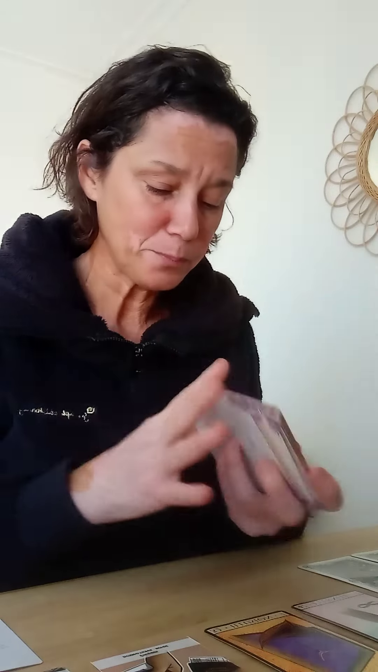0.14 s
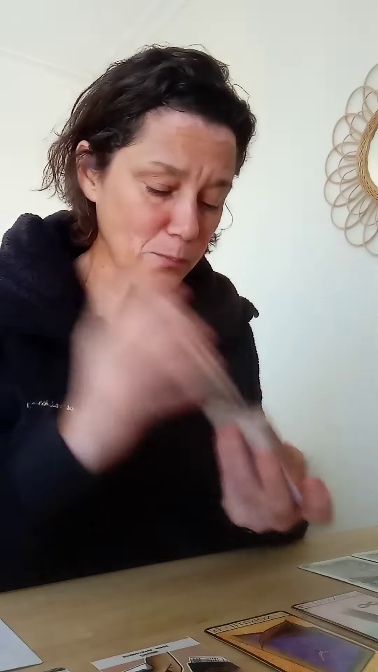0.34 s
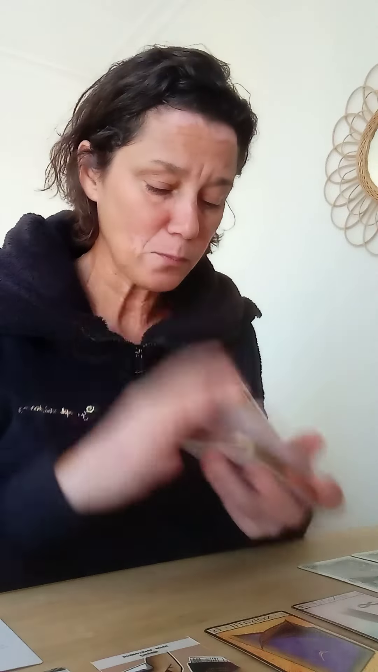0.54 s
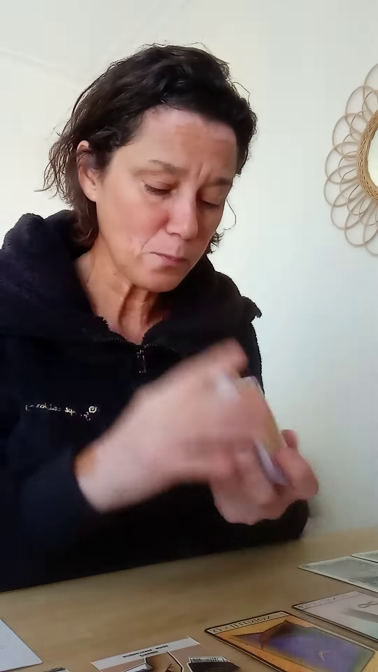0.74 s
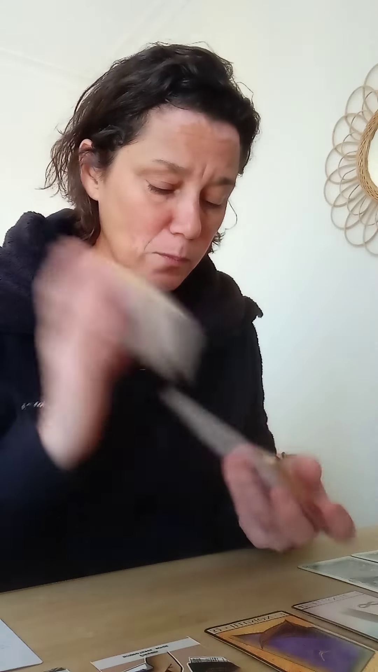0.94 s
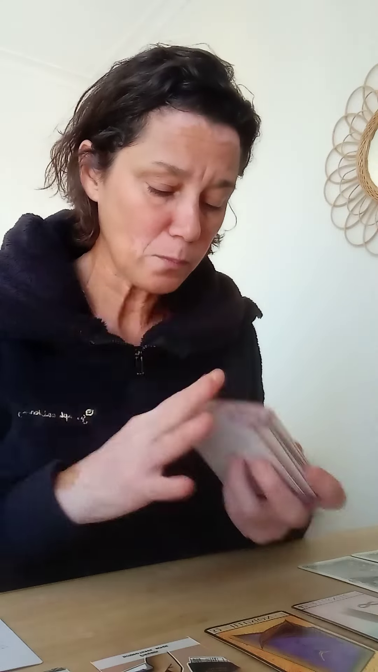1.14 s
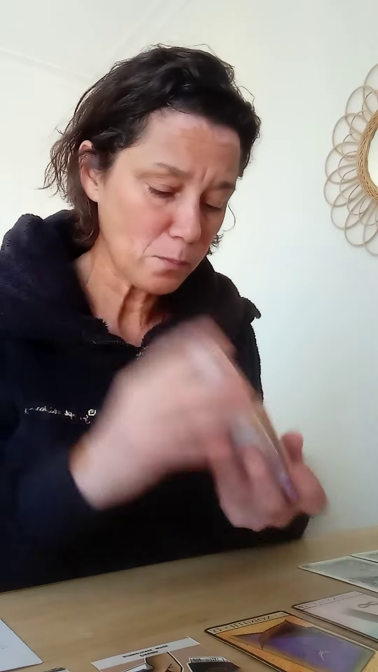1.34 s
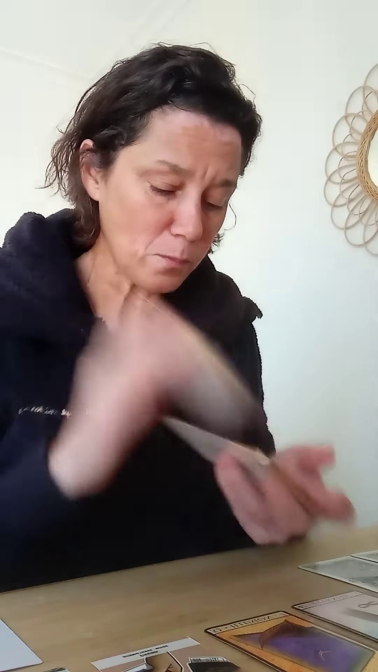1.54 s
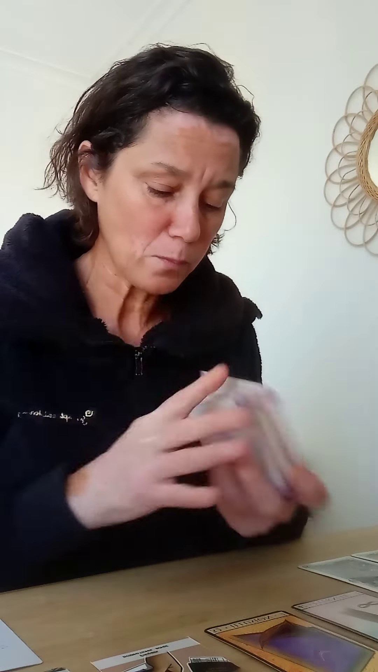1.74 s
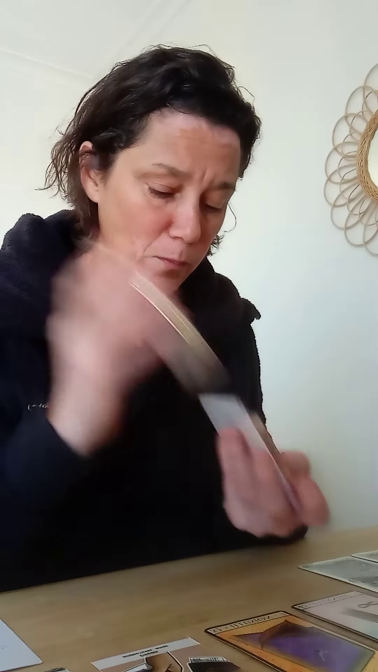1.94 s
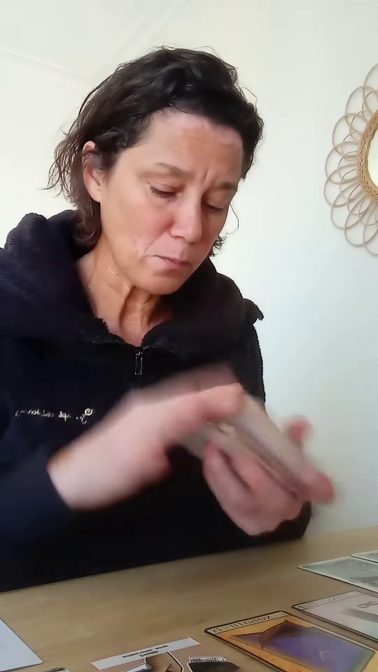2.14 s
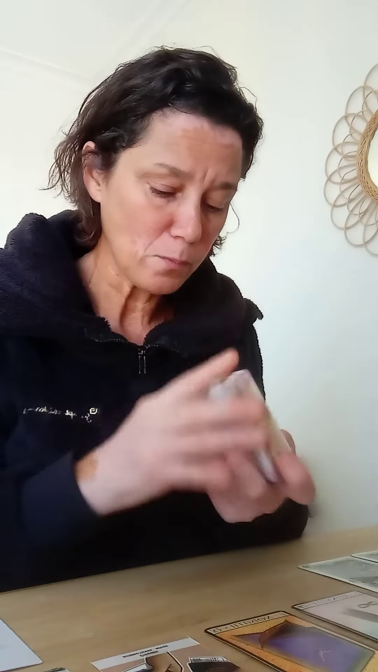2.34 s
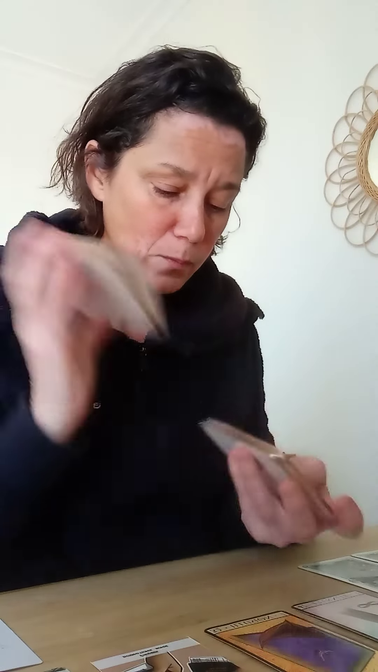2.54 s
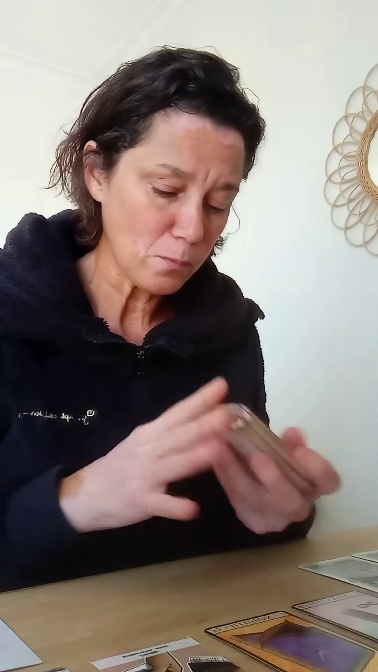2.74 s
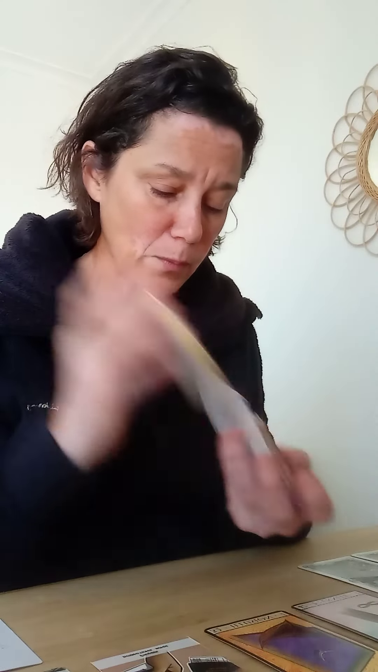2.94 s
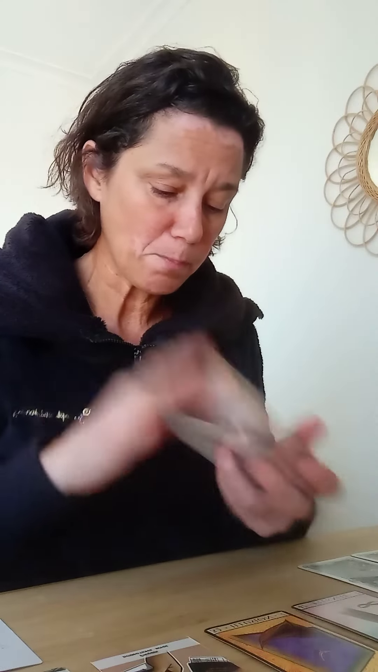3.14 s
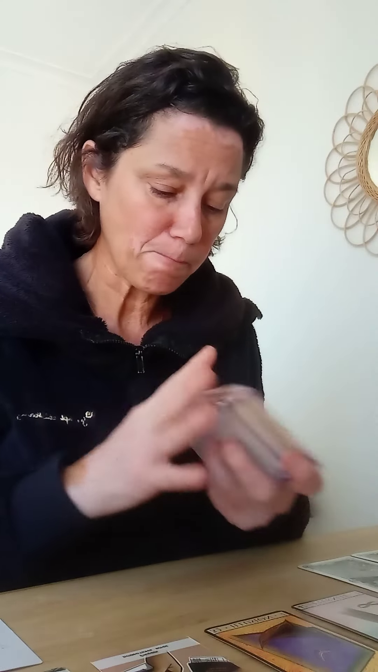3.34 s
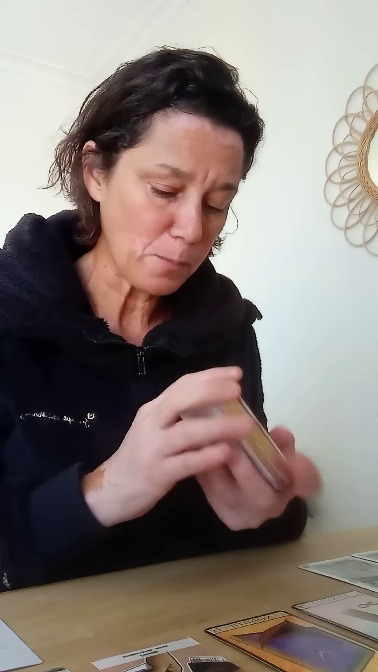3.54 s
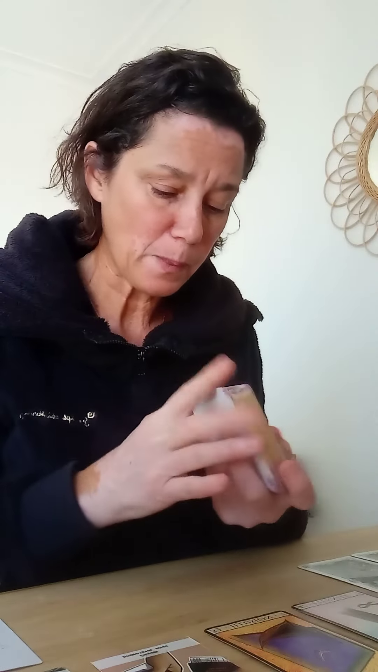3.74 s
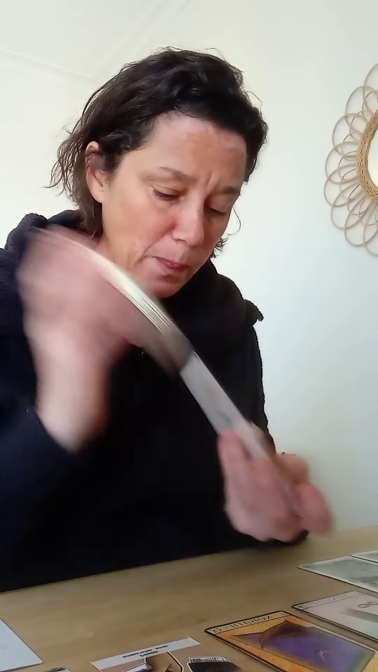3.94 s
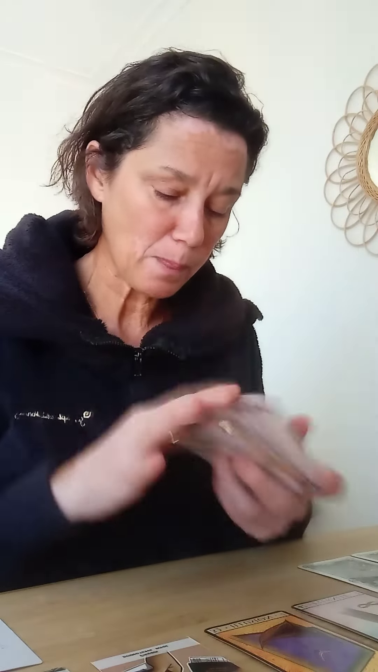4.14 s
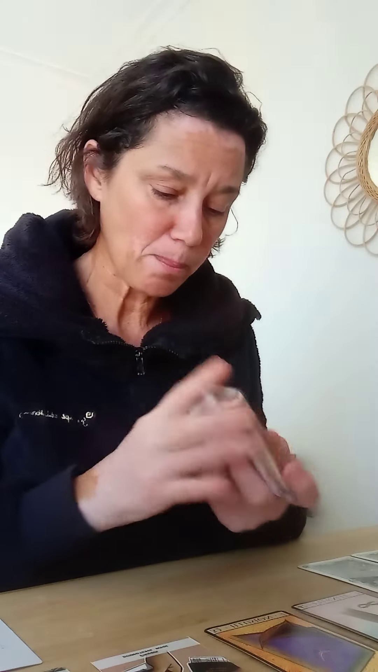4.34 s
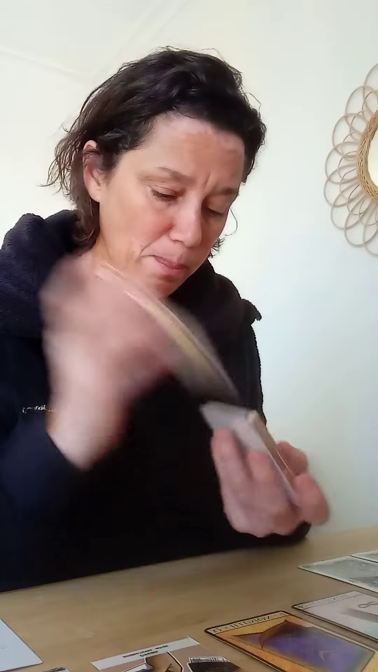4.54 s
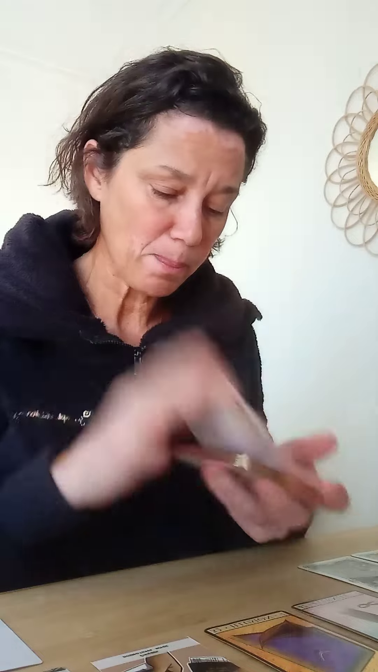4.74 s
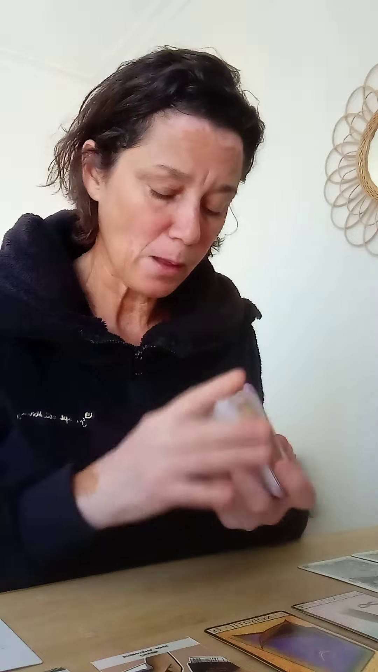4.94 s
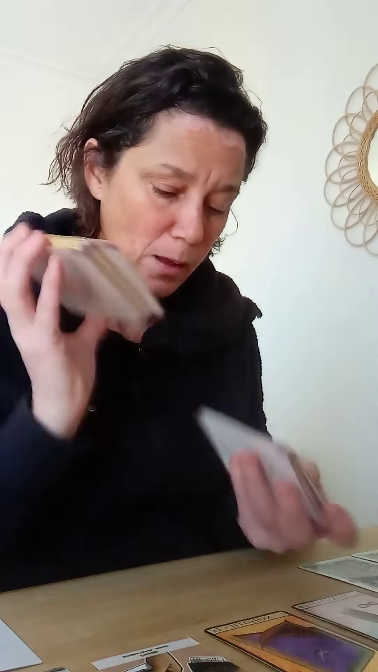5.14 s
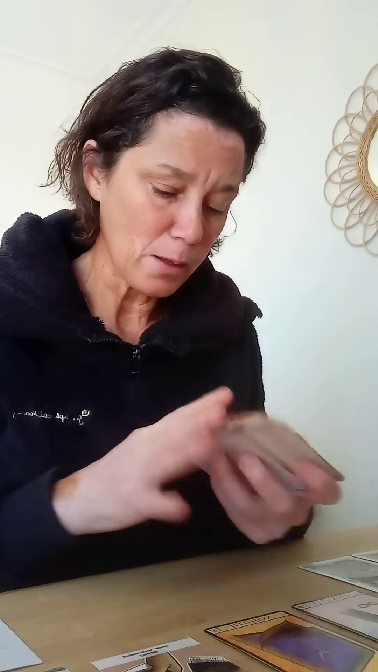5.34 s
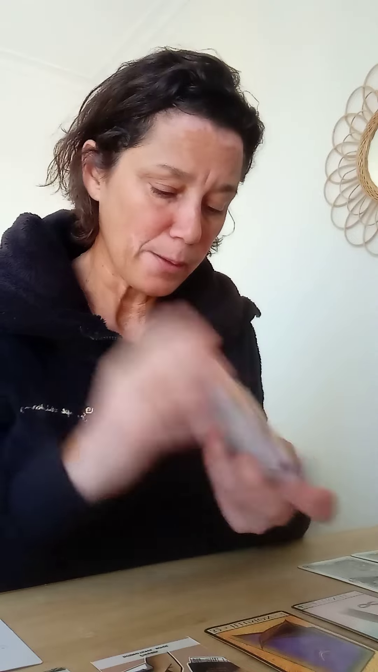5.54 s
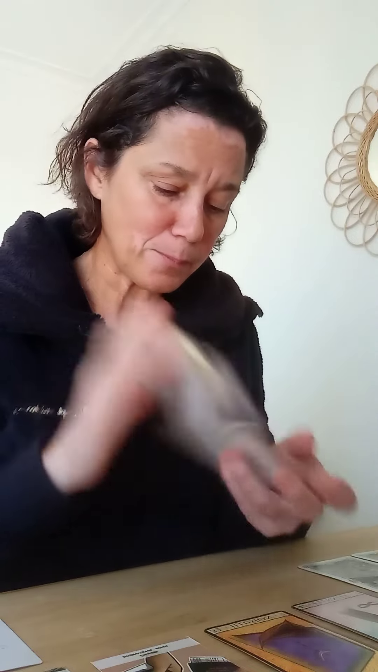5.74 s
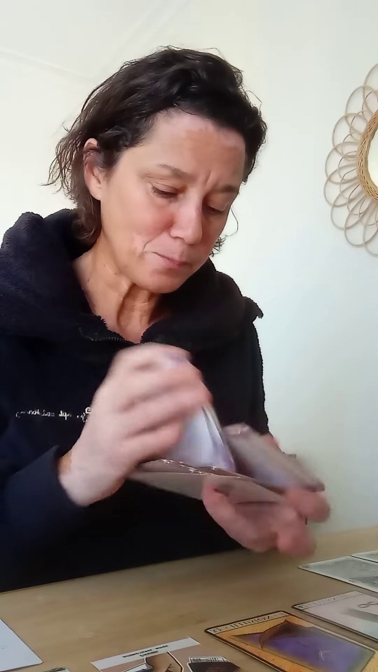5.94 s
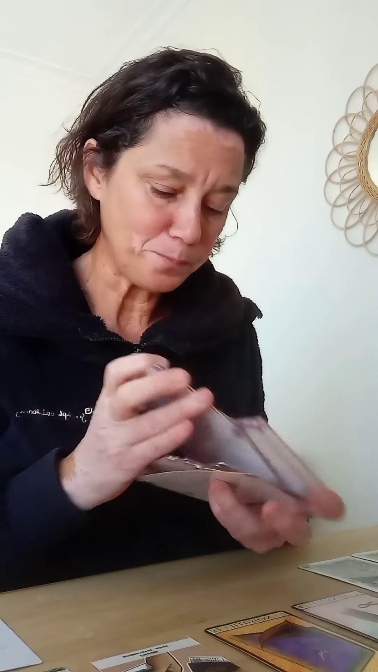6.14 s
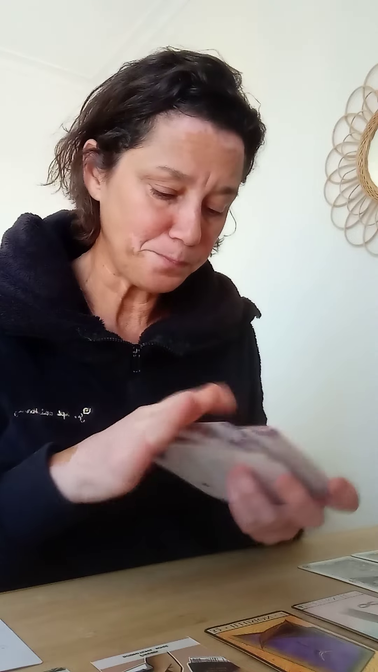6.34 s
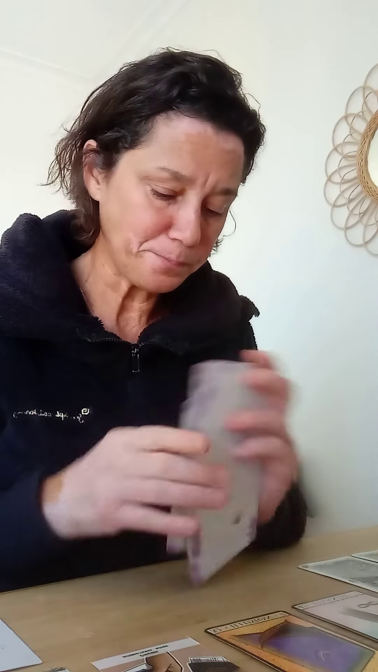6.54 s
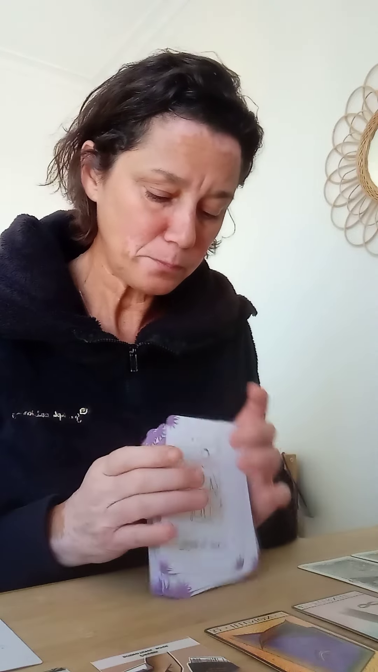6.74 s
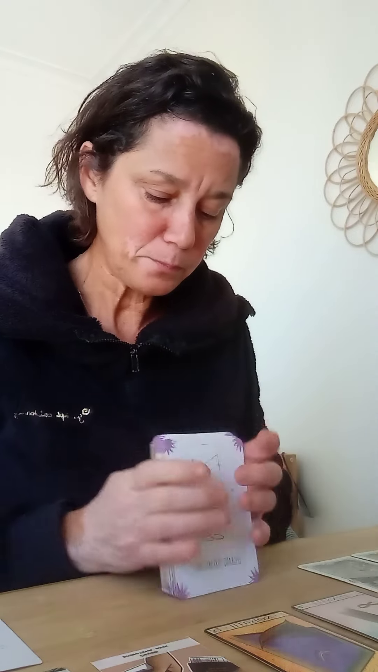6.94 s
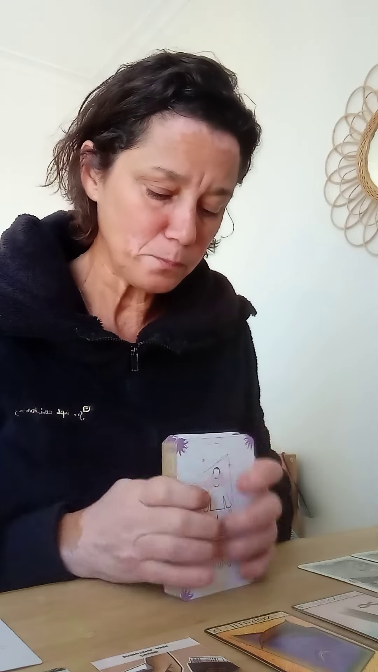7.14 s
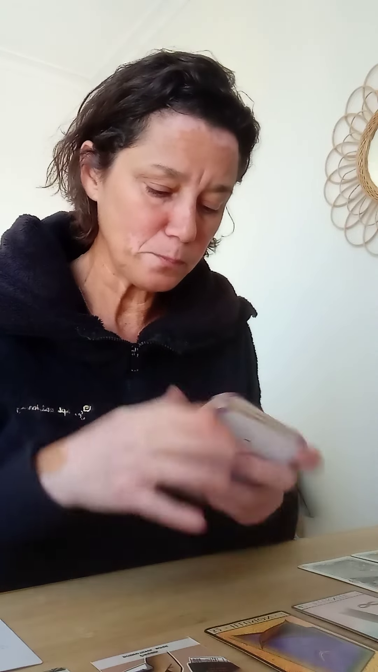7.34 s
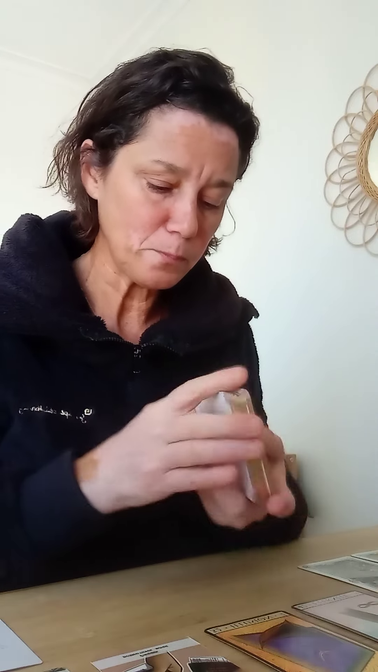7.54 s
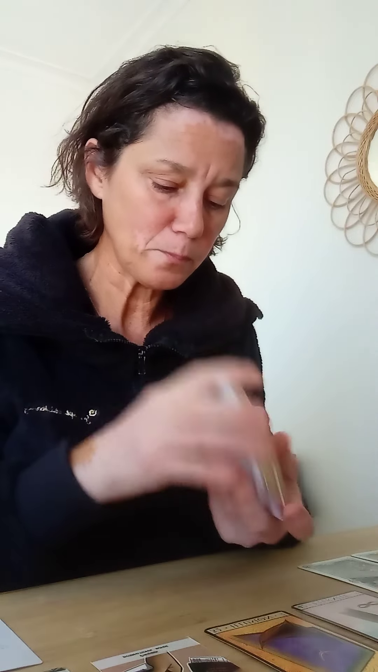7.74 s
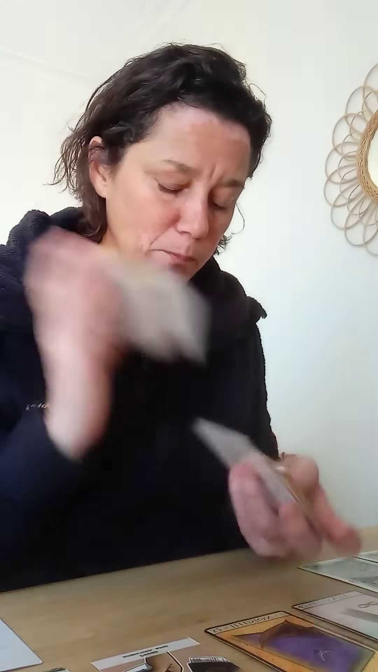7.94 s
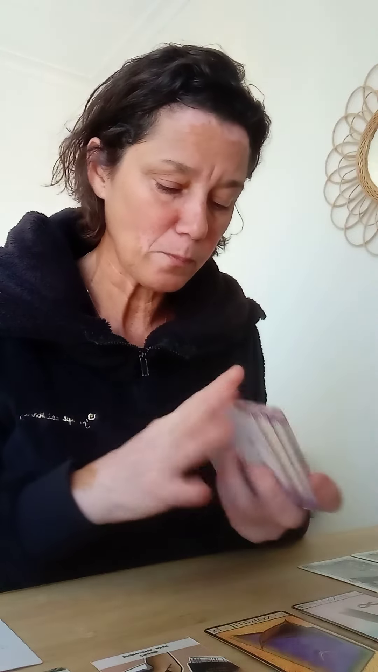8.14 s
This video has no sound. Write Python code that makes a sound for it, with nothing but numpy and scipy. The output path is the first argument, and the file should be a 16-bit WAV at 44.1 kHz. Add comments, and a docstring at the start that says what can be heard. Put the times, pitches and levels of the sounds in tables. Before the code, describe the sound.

Crisp papery card slaps and short slides repeat in a quiet bare room, interrupted by a clattering burst of deck-on-wood taps.

```python
"""Packets of large cards slap back into a deck about twice a second: an overhand shuffle in a quiet, bare room.
Each slap is a cluster of noisy card contacts; claps are pressure spikes, slides are grainy filtered noise.
Near the end the deck drops on edge on a wooden table, whose top rings as decaying modes, and is squared up.
Then the shuffle goes on. Room reflections are noise bands that follow the energy of the hands and table."""
import sys
import numpy as np
from scipy import signal
from scipy.fft import rfft, irfft
from scipy.io import wavfile
from scipy.ndimage import uniform_filter1d

SR = 44100
rng = np.random.default_rng(int(sys.argv[2]) if len(sys.argv) > 2 else 0)


def to_wav(s):
    """Save 16-bit WAV."""
    ch = np.atleast_2d(s).T  # columns
    pcm = np.round(np.clip(ch, -1, 1) * 32767)  # PCM
    wavfile.write(sys.argv[1], SR, pcm.astype(np.int16))


N = 361619
TIME = np.arange(N) / SR

# A packet brushes the deck, lands on its edge, then falls flat while loose cards trail after it.
# Levels are relative to the layer gains. Each row: edge landing in seconds, brush lead in ms,
# brush level in dB, edge level in dB, fall time in ms, flat level in dB, extra bass in dB, extra treble in dB,
# trail in ms, palm thump in dB, air pocket in Hz, its boost in dB, card flex in Hz, its boost in dB.
STROKES = [(0.0514, 16.4, -34.5, -24.5, 7, -26, -3.5, -1, 8.9, -50.5, 543, 7, 3340, 5),
           (.583, 10.5, -41.5, -26, 16.6, -30.5, -3.5, 1.5, 12.1, -52, 370, 3, 1730, 4),
           (1.0511, 16, -39.5, -26, 12, -30.5, -0.5, 0, 28.7, -40.5, 358, 3.5, 990, 2),
           (1.611, 4.3, -43, -28, 18, -29.5, -5, 0.5, 8.4, -42, 497, 9, 5040, -0.5),
           (2.178, 12.1, -32.5, -29.5, 8.9, -36.5, -3.5, 0.5, 21, -50.5, 373, 2.5, 3300, 0.5),
           (2.673, 21.2, -39, -30.5, 12.5, -24, -1.5, -3.5, 4.8, -46.5, 490, 1, 5500, 6.5),
           (3.195, 20.5, -37, -28.5, 2.5, -35, 2.5, 0.5, 10, -38.5, 443.5, -4, 1140, 9.5),
           (4.158, 15, -39.5, -26.5, 14.3, -31, -1.5, 2.5, 75, -42.5, 463, 3, 2300, 4),
           (4.7861, 8.3, -52.5, -21, 17.4, -21.5, -2, -1, 16, -63.5, 900, 6, 2540, 10),
           (5.2988, 15, -32.5, -18, 15, -26, -3.5, -2, 19, -40.5, 310, -2.5, 1510, 8),
           (5.8019, 22.3, -23.5, -20, 8.5, -25.5, -4.5, 0.5, 42, -52.5, 670, 7, 1520, 7.5),
           (5.9425, 15, -32, -25, 30, -28.5, -8, -6.5, 20, -48.5, 920, 0, 1640, -2),
           (6.29, 8.5, -42.5, -34.5, 16.5, -37, -2.5, 2, 10, -65, 940, 9, 1360, 8.5),
           (8.062, 17, -59, -24, 13.3, -24.5, -1.5, -4, 20, -54, 399.3, 5.5, 1530, 4.5)]
# phases of a stroke: (length ms, extra bass dB, extra treble dB)
BRUSH, EDGE, FLAT, STRAGGLER = (1.1, -1.5, -1.3), (2.37, 0, 0.59), (3.97, -1.2, 3.2), (3.1, -1.4, 0)
# riffle level against the edge and scuff level against the brush
RIFFLE_DB, SCUFF_DB = -7.5, -8
# a slow fall spreads the riffle thin; the scuff comes just before the edge lands
RIFFLE_THINNING_DB_PER_MS, SCUFF_MS = 0.07, 7
# loose cards: spacing, level under the flat blow, loss along the trail
STRAGGLER_MS, STRAGGLER_DB, TRAIL_LOSS_DB = 11, -3.5, 3
# the palm takes the blow just after the packet falls flat
THUMP_HZ, THUMP_LAG_S = 140, 0.006
# the packet swishes in ahead of its landing; level before the slide gains
SWISH_LEAD_S, SWISH_RISE_S, SWISH_DB = 0.022, 0.021, -70.5
# a slide stops in this time plus a share of its rise
STOP_S, STOP_SHARE = 0.005, 0.32
# random faint catches per slide: number, level setting against the hiss setting, tilt towards treble
CATCH_COUNT, CATCH_DB, CATCH_TILT_DB = 3, -9.5, 8
# unevenness of a card's flexing response: depth and spacing of its peaks
FLEX_DB, FLEX_SPACING_HZ = 2.7, 300
# boost at the card flex of a knock, and the weaker bounce that follows each one
KNOCK_BOOST_DB, BOUNCE_S, BOUNCE_DB = 10.5, 0.025, -12.5
LOW_CUT_HZ, CUTOFF_HZ = 81, 15900


def from_db(db):
    """Decibels to gain."""
    return 10 ** (np.asarray(db) / 20)


def rms_one(x):
    """Scale to unit rms."""
    return x / np.sqrt(np.mean(x ** 2) + 1e-20)


def at_hz(points, hz, axis=1):
    """Read a column of a table on a log-frequency axis."""
    points = np.array(points, float)
    return np.interp(np.log(hz + 1), np.log(points[:, 0]), points[:, axis])


def add(out, s, sound):
    """Mix a sound in at time s."""
    start = max(round(s * SR), 0)
    out[start:start + len(sound)] += sound[:N - start]


def response(colour, shape=1, size=2048):
    """Causal impulse response of a colour at unit rms over frequency, times a further spectral shape."""
    hz = np.arange(size // 2 + 1) * SR / size
    spectrum = rms_one(from_db(at_hz(colour, hz))) * shape
    # folding the cepstrum forward in time gives minimum phase
    cepstrum = irfft(np.log(spectrum))
    cepstrum[1:size // 2] *= 2
    cepstrum[size // 2 + 1:] = 0
    return irfft(np.exp(rfft(cepstrum)))


def through(x, impulse):
    """Convolve, keeping the length of the scene."""
    return signal.oaconvolve(x, impulse)[:N]


def ring(x, modes):
    """Drive decaying resonances of alternating sign with a sound."""
    out = np.zeros(len(x))
    for k, (hz, db, t60) in enumerate(modes):
        radius = from_db(-60 / (t60 * SR))
        w = 2 * np.pi * hz / SR
        mode = signal.lfilter([0, np.sin(w)], [1, -2 * radius * np.cos(w), radius ** 2], x + 1e-18)
        out += (-1) ** k * from_db(db) * mode
    return out


def fading(power, t60):
    """Stored energy leaks away by 60 dB in t60 seconds."""
    keep = np.exp(-np.log(1e6) / (t60 * SR))
    return signal.lfilter([1 - keep], [1, -keep], power + 1e-18)


def faint_air():
    """Very faint air is steady noise weighted towards the low end."""
    # Each row: frequency in Hz, relative level in dB.
    air_colour = [(30, -3.5), (130, 15.5), (500, -7.5), (3000, -19), (16000, -32)]
    return from_db(-86.5) * through(rng.standard_normal(N), response(air_colour))


def room(x, build_s, early_share, early_t60, count=40):
    """Cards radiate unevenly, so reflections sum to a diffuse wash that dies band by band."""
    # Reverberation. Each row: frequency in Hz, level in dB against the driving sound, t60 in seconds.
    reverberation = [(60, -5, 0.46), (127, 1, 1), (293, 3, 0.35), (740, -1.5, 0.47), (1580, -2.5, 0.51),
                     (3570, -6, 0.46), (6260, -7, 0.41), (10000, -4, 0.13), (15500, -15.5, 0.063)]
    # Standing waves of the room. Each row: frequency in Hz, drive gain in dB, t60 in seconds.
    standing_waves = [(132, -56, 0.5), (154, -58.5, 0.29), (185, -67, 0.29), (294, -53, 0.42)]
    edges = np.linspace(np.cbrt(70), np.cbrt(16200), count + 1) ** 3
    white = rng.standard_normal((2, N))
    out = ring(x, standing_waves)
    for k, (low, high) in enumerate(zip(edges, edges[1:])):
        band = signal.butter(2, [low, high], "band", fs=SR, output="sos")
        centre = np.sqrt(low * high)
        arriving = fading(signal.sosfilt(band, x + 1e-9 * white[0]) ** 2, build_s)
        # near surfaces answer first, the walls hold the rest
        near = early_share * fading(arriving, early_t60)
        walls = (1 - early_share) * fading(arriving, at_hz(reverberation, centre, axis=2))
        wash = rms_one(signal.sosfilt(band, white[k % 2]))
        out += from_db(at_hz(reverberation, centre)) * np.sqrt(near + walls) * wash
    return out


def friction(colour, grain_db, catches_per_s):
    """Sliding card catches and slips at random, so its hiss is grainy."""
    grip = np.interp(TIME * catches_per_s, np.arange(N), rng.standard_normal(N))
    return through(rms_one(rng.standard_normal(N) * from_db(grain_db * grip)), response(colour))


def slide_motions():
    """The swish before every stroke and the pairs of slides: (s, rise s, hiss dB, rub dB)."""
    # Between strokes cards slide in pairs of short hisses; levels come before the slide gains.
    # Each row: one slide in seconds, its rise in seconds, its hiss in dB, another slide in seconds,
    # its rise in seconds, its hiss in dB, edge rub against hiss in dB.
    slide_pairs = [(0.29, 0.027, -46.5, .36, 0.019, -60.5, -18.5),
                   (0.824, 0.025, -61.5, .875, 0.05, -54, -14.5),
                   (1.308, 0.018, -60, 1.40, 0.039, -55.5, -9),
                   (1.936, 0.031, -55, 1.979, .018, -56.5, -11.5),
                   (2.425, 0.073, -64, 2.487, 0.012, -51.5, -9),
                   (2.975, 0.036, -49.5, 3.06, 0.016, -67.5, -17),
                   (3.111, 0.007, -65, 3.16, 0.029, -72, -5), (3.422, 0.082, -61, 3.51, .035, -63.5, -6.5),
                   (3.58, 0.051, -67.5, 3.65, .04, -67, -5.5), (3.762, 0.007, -77, 3.812, 0.015, -73.5, 0),
                   (3.937, 0.023, -54, 3.91, 0.035, -63.5, -13.5),
                   (4.358, 0.027, -52.5, 4.432, 0.029, -53, -15.5),
                   (4.554, 0.068, -59, 4.60, .018, -63, -15),
                   (5.069, .042, -61.5, 5.11, 0.032, -57.5, -3.5),
                   (5.495, 0.022, -58.5, 5.625, 0.057, -55, -10),
                   (6.15, 0.18, -62, 6.305, 0.028, -46.5, -6), (6.39, 0.02, -56, 6.556, 0.013, -61.5, 5),
                   (7.254, 0.064, -68.5, 7.32, 0.031, -69, 5), (7.473, .012, -85.5, 7.549, 0.011, -73, 2),
                   (7.85, 0.042, -67, 7.877, 0.019, -52.5, -8.5)]
    rows = [(s - SWISH_LEAD_S, SWISH_RISE_S, SWISH_DB, SWISH_DB) for s, *_ in STROKES]
    for one_s, one_rise_s, one_db, other_s, other_rise_s, other_db, rub_db in slide_pairs:
        rows.append((one_s, one_rise_s, one_db, one_db + rub_db))
        rows.append((other_s, other_rise_s, other_db, other_db + rub_db))
    return rows


def slides(hiss_db, rub_db):
    """Smooth faces hiss and edges rub while a packet speeds up and stops."""
    # Colours of faces and edges. Each row: frequency in Hz, relative level in dB.
    hiss_colour = [(100, -30), (1500, -17), (4500, -5), (6500, 1), (8000, -9), (10000, -13), (13400, -21),
                   (15000, -3), (15700, -2), (16500, -14)]
    rub_colour = [(60, -10), (200, -8), (800, -2.5), (1500, 0.5), (3200, 5), (6000, -12.5), (16000, -48)]
    hiss, rub = np.zeros(N), np.zeros(N)
    for s, rise_s, hiss_level, rub_level in slide_motions():
        fall_s = STOP_S + STOP_SHARE * rise_s
        on = np.abs(TIME - s) < 3 * max(rise_s, fall_s)
        t = TIME[on] - s
        speed = np.exp(-(t / np.where(t < 0, rise_s, fall_s)) ** 2)
        hiss[on] += speed * from_db(hiss_level + hiss_db)
        rub[on] += speed * from_db(rub_level + rub_db)
    faces = hiss * friction(hiss_colour, grain_db=3, catches_per_s=450)
    edges = rub * friction(rub_colour, grain_db=5, catches_per_s=450)
    return faces + edges


def thumps():
    """The palm stops every packet with a soft thump: (s, dB, Hz)."""
    rows = []
    for s, _, _, _, fall_ms, _, _, _, _, thump_db, *_ in STROKES:
        rows.append((s + fall_ms / 1000 + THUMP_LAG_S, thump_db, THUMP_HZ))
    return rows


def bumps(cycles, size=4096):
    """Flesh damps the deck within a few swings: short decaying sines."""
    # The deck bumps softly against the fingers as it is regripped.
    # Each row: start in seconds, undamped level in dB, pitch in Hz.
    regrips = [(.39, -58, 170), (.901, -54, 480), (1.431, -50.5, 200), (1.457, -42, 388),
               (3.987, -41.5, 417), (4.011, -50, 159), (5.082, -50, 560), (5.642, -51, 150),
               (7.223, -52, 200.5), (7.392, -55.5, 150)]
    out, t = np.zeros(N), np.arange(size) / SR
    for s, db, hz in list(regrips) + thumps():
        add(out, s, from_db(db) * np.sin(2 * np.pi * hz * t) * np.exp(-hz * t / cycles))
    return out


def hollow_db(hollows, hz, width):
    """Trapped air and flexing cards boost the sound around their resonances, given as (Hz, dB)."""
    return sum(db / (1 + ((hz / centre - 1) / width) ** 2) for centre, db in hollows)


def contacts(rows, colour, grain_db, attack_share, sag_db, settle_ms, size=2048):
    """Cards land one after another: tiny uneven impacts that build, weaken, then settle."""
    out = np.zeros(N)
    ms = np.arange(size) * 1000 / SR
    hz = np.arange(size // 2 + 1) * SR / size
    for s, length_ms, bass_db, middle_db, treble_db, hollows in rows:
        done = np.minimum(ms / length_ms, 1)
        build = 1 - np.exp(-done / attack_share)
        settle = np.exp(-np.maximum(ms - length_ms, 0) / settle_ms)
        force = build * from_db(-sag_db * done) * settle
        impacts = force * rng.standard_normal(size) * from_db(grain_db * rng.standard_normal(size))
        # the run is evened out over frequency, so that its colour comes from the cards and the grip
        spread = np.sqrt(uniform_filter1d(np.abs(rfft(impacts)) ** 2, size=15) + 1e-12)
        # held differently each time, the cards favour other flexing frequencies
        flex_db = FLEX_DB * np.interp(hz / FLEX_SPACING_HZ, np.arange(size), rng.standard_normal(size))
        level_db = at_hz([(400, bass_db), (900, middle_db), (2000, middle_db), (3800, treble_db)], hz)
        shape_db = level_db + flex_db + hollow_db(hollows, hz, width=0.081)
        body = response(colour, from_db(shape_db) / spread)
        # longer runs carry more energy
        add(out, s, np.sqrt(length_ms * SR / 1000) * signal.fftconvolve(impacts, body))
    return out


def tick_contacts(catch_ms, scatter_db):
    """The clear catches of the grip, and faint ones scattered over each slide."""
    # Card edges catch as the deck is gripped and split; levels come before the tick gain.
    # Each row: start in seconds, length in ms, level in dB, tilt towards treble in dB.
    clear_catches = [(.3914, 3.2, -55, 7), (1.012, 4.8, -53.5, 5), (1.4186, 3.1, -56, 16.5),
                     (1.4305, 6.4, -50, -1), (1.4561, 1.3, -41.5, 7), (1.985, 3.1, -42, -1),
                     (2.336, 5.4, -52.5, 6.5), (2.4912, 2.6, -42.5, 4), (3.0127, 3.1, -50.5, 4),
                     (3.5015, 3.1, -67.5, 17), (3.9867, 7.4, -53, 7), (4.5744, 2.8, -46, 8),
                     (5.0805, 2.1, -41, 2), (5.1215, 1.1, -32.5, 3.5), (5.6139, 1.3, -62, 17),
                     (5.6582, 5, -53, 7), (6.2541, 8.6, -50, -1.5), (6.4306, 8.6, -46.5, -7.5),
                     (6.4395, 6.8, -50, 7.5), (6.5472, 12, -58, 13.5), (7.3132, 20, -56.5, 4.5),
                     (7.3911, 2.8, -56, -4), (7.4664, 6.2, -54.5, -3)]
    catches = list(clear_catches)
    for s, rise_s, hiss_db, _ in slide_motions():
        for when, luck in rng.uniform(-0.62, 1, size=(CATCH_COUNT, 2)):
            db = hiss_db + CATCH_DB + scatter_db * luck
            catches.append((s + when * rise_s, catch_ms, db, CATCH_TILT_DB))
    return [(s, ms, db - tilt_db, db, db + tilt_db, []) for s, ms, db, tilt_db in catches]


def settling():
    """Loose card edges chatter against each other as the deck is squared."""
    # Chatter envelope. Each row: time in seconds, level in dB before the mix gain.
    chatter = [(6.78, -75), (6.805, -33.5), (6.85, -38.5), (6.9, -54.5), (6.97, -63), (7.052, -60.5),
               (7.1, -71)]
    # Each row: frequency in Hz, relative level in dB.
    chatter_colour = [(100, -22), (700, 8.5), (1150, 12), (2000, 4.5), (3800, 6), (4800, -28),
                      (7000, -27.5), (9000, -50.5), (16000, -60)]
    s, db = np.transpose(chatter)
    level = from_db(np.interp(TIME, s, db, left=-np.inf, right=-np.inf))
    return level * friction(chatter_colour, grain_db=5.5, catches_per_s=700)


def knock_contacts():
    """Every drop on the table is followed by a weaker bounce of part of the deck."""
    # The deck drops on edge onto the table; levels come before the knock gain.
    # Each row: start in seconds, length in ms, level in dB, tilt towards treble in dB, card flex in Hz.
    drops = [(6.62, 4.5, -22, -0.5, 610), (6.659, 1.9, -52, 29, 2440), (6.67, 7.2, -18.5, -0.5, 2430),
             (6.7283, 7.8, -24, -3, 1660), (6.74, 1.7, -23, 6.5, 1710), (6.762, 2.2, -35, 9.5, 2450),
             (6.77, 3, -22.5, 4.5, 1650), (6.7991, 4.5, -25, 9, 3650), (6.8495, 1.3, -27.5, 5, 1670),
             (6.8745, 3.8, -26.5, 6, 2690), (6.94, 3.6, -34.5, 4, 2500), (6.953, 1.07, -30, -7.5, 870),
             (7.0, 23, -45.5, -8.5, 635), (7.0248, 5.3, -30.5, 2.5, 686), (7.221, 19, -50.5, -3, 890)]
    rows = []
    for s, ms, drop_db, tilt_db, flex_hz in drops:
        for late_s, loss_db in ((0, 0), (BOUNCE_S, BOUNCE_DB)):
            db = drop_db + loss_db
            rows.append((s + late_s, ms, db - tilt_db, db, db + tilt_db, [(flex_hz, KNOCK_BOOST_DB)]))
    return rows


def table_top(knocks):
    """The knocks excite the wooden top, which rings in its own modes."""
    # Each row: frequency in Hz, relative drive gain in dB, t60 in seconds.
    table_modes = [(197.3, -31.5, 0.33), (404, -15, 0.075), (571, -15, 0.2), (658, -37, 0.37),
                   (1003, -20.5, 0.22), (1117, -17, 0.37), (1160, -22.5, 0.32), (1148, -27.5, 0.073),
                   (1570, -27.5, 0.18), (2140, -14, 0.056), (2570, -12, 0.025)]
    return from_db(-30) * ring(knocks, table_modes)


def claps(rebound, size=512):
    """A packet closing flat squeezes out air: a pressure spike, then a slower, weaker suction."""
    # Each row: spike centre in seconds, spike level in dB before suction, width in ms.
    closings = [(0.5959, -14.5, 0.11), (2.1645, -50, 0.3), (2.6882, -19.5, 0.047), (3.2061, -19.5, 0.36),
                (4.1685, -33, 0.069), (5.3318, -7, 0.1), (5.809, -28.5, 0.14), (5.841, -30.5, .12)]
    out = np.zeros(N)
    ms = (np.arange(size) - size // 2) * 1000 / SR
    for s, db, width_ms in closings:
        u = 2 * ms / width_ms
        suction = rebound * np.exp(-(rebound * u - 1) ** 2)
        add(out, s - size / 2 / SR, from_db(db) * (np.exp(-u ** 2) - suction))
    return out


def stroke_contacts(scatter_db):
    """Each stroke unfolds as brush, scuff, edge, riffle, flat blow and a dying trail of loose cards."""
    rows = []
    for (s, lead_ms, brush_db, edge_db, fall_ms, flat_db, bass_db, treble_db,
         trail_ms, _, air_hz, air_db, flex_hz, flex_db) in STROKES:
        flat_s = s + fall_ms / 1000
        riffle_db = edge_db + RIFFLE_DB - RIFFLE_THINNING_DB_PER_MS * fall_ms
        phases = [(s - lead_ms / 1000, brush_db, BRUSH),
                  (s - SCUFF_MS / 1000, brush_db + SCUFF_DB, (SCUFF_MS, 0, 0)),
                  (s, edge_db, EDGE),
                  (s, riffle_db, (fall_ms, 0, 0)),
                  (flat_s, flat_db, FLAT)]
        for k, (early, luck) in enumerate(rng.uniform(-1, 1, size=(8, 2))):
            late_ms = STRAGGLER_MS * (k + 1 + early / 2)
            if late_ms < trail_ms:
                db = flat_db + STRAGGLER_DB - TRAIL_LOSS_DB * late_ms / trail_ms + scatter_db * luck
                phases.append((flat_s + late_ms / 1000, db, STRAGGLER))
        hollows = [(air_hz, air_db), (flex_hz, flex_db)]
        for when, db, (ms, low_db, high_db) in phases:
            rows.append((when, ms, db + bass_db + low_db, db, db + treble_db + high_db, hollows))
    return rows


def scene():
    """Hands, cards and table in the room, over very faint air."""
    # Colours of the contacts. Each row: frequency in Hz, relative level in dB.
    slap_colour = [(60, -10.5), (120, -10.5), (250, -5.5), (500, -2.5), (900, -8.5), (1600, -2),
                   (2500, -6.5), (3300, -2.5), (4500, -8), (6600, -3.5), (7800, -19.5), (13200, -31.5),
                   (15300, -10), (16500, -33)]
    tick_colour = [(60, -14.5), (250, -17), (500, 2.5), (900, -4), (1600, 1.5), (2500, -2), (4500, -9),
                   (6600, -4), (7800, -29), (13200, -35), (15300, -13.5), (16500, -26)]
    knock_colour = [(60, -17), (120, -3.5), (200, -3.5), (500, -3.5), (900, 3), (1600, -0.5), (2700, -4.5),
                    (4500, -24.5), (6500, -24.5), (8000, -49), (13000, -60), (15300, -46), (16500, -71)]
    slaps = from_db(-1.29) * contacts(stroke_contacts(scatter_db=7), slap_colour, grain_db=2.5,
                                      attack_share=0.14, sag_db=5.0, settle_ms=1.0)
    ticks = from_db(-3.0) * contacts(tick_contacts(catch_ms=1.4, scatter_db=1.5), tick_colour, grain_db=3.5,
                                     attack_share=0.15, sag_db=13.0, settle_ms=1.0)
    knocks = from_db(-3.47) * contacts(knock_contacts(), knock_colour, grain_db=5,
                                       attack_share=0.024, sag_db=13.5, settle_ms=1.9)
    table = knocks + from_db(2.5) * settling()
    table_ring = table_top(knocks)
    hands = slaps + ticks + claps(rebound=0.45) + bumps(cycles=1.1) + slides(hiss_db=-2.5, rub_db=1.0)
    air = faint_air()
    echo = room(hands + from_db(-2.5) * table, build_s=0.25, early_share=0.85, early_t60=0.012)
    return (hands + table + table_ring + echo + air)[None]


def record(dry):
    """The small microphone loses the deep bass; the top of the treble is cut steeply."""
    thin = signal.sosfilt(signal.butter(2, LOW_CUT_HZ, "high", fs=SR, output="sos"), dry)
    return signal.sosfilt(signal.ellip(10, 0.3, 70, CUTOFF_HZ, fs=SR, output="sos"), thin)


dry = scene()
out = record(dry)
to_wav(out)
```